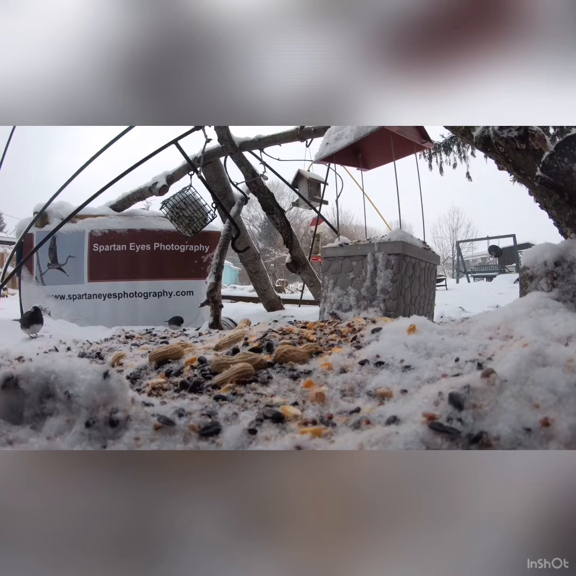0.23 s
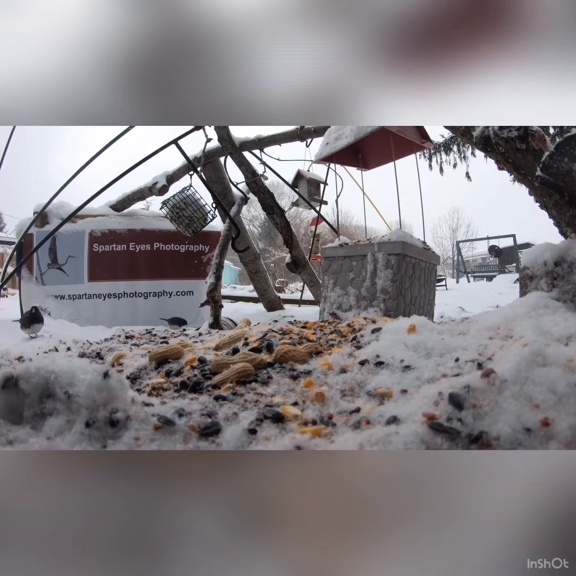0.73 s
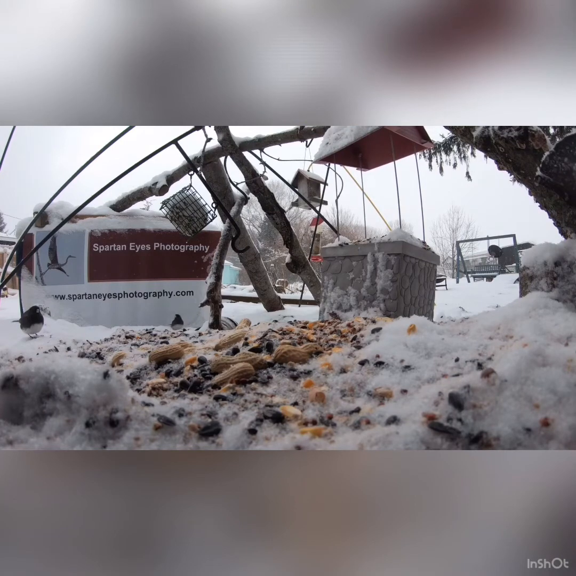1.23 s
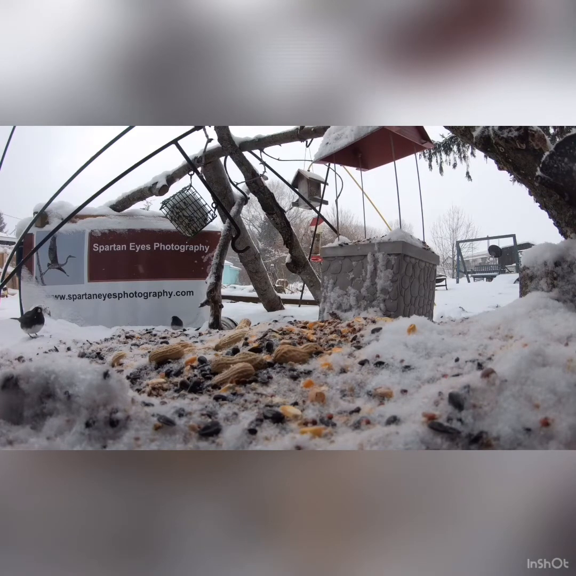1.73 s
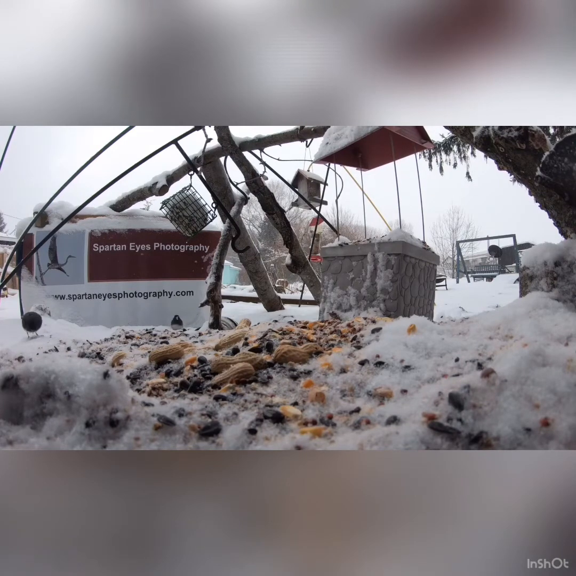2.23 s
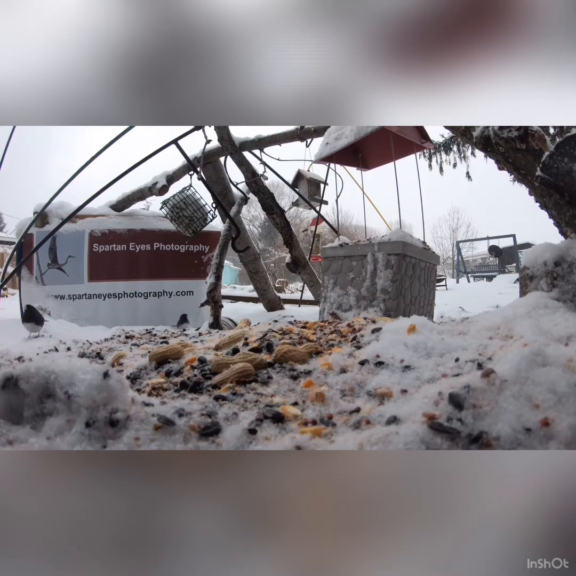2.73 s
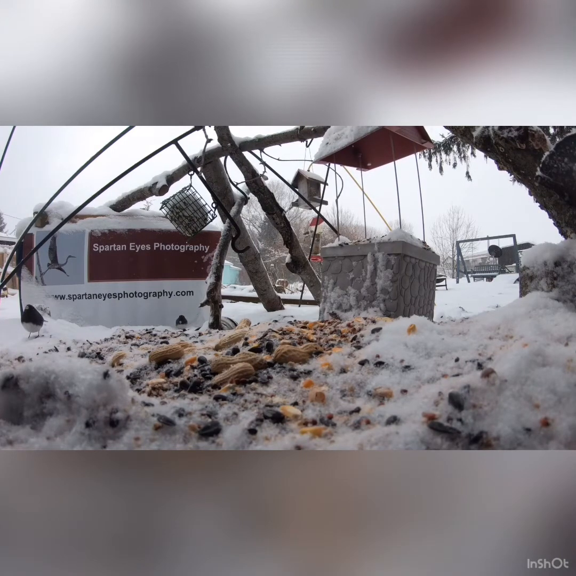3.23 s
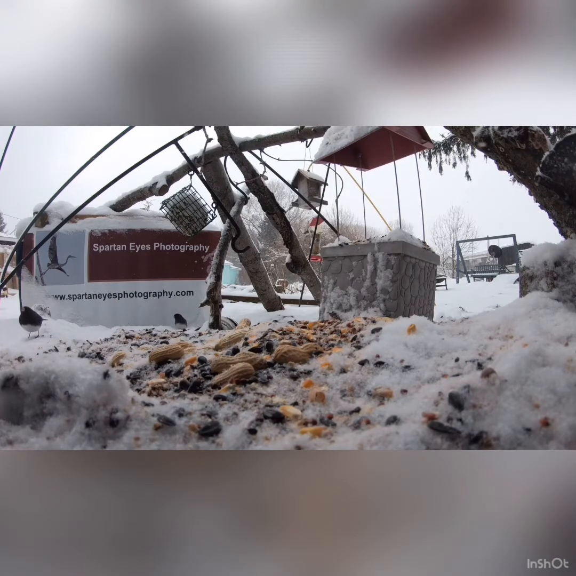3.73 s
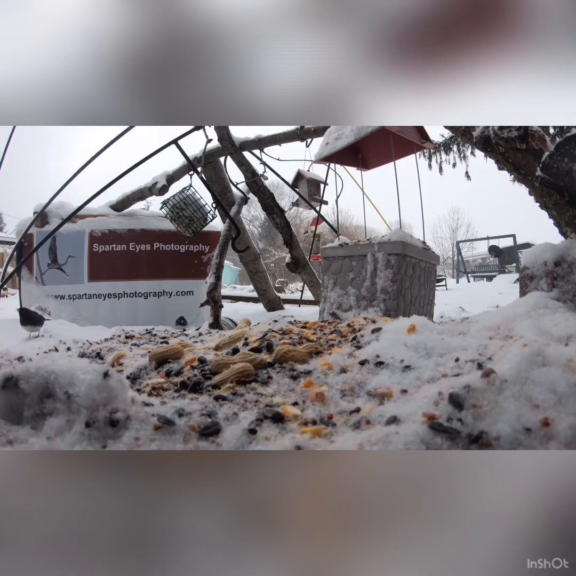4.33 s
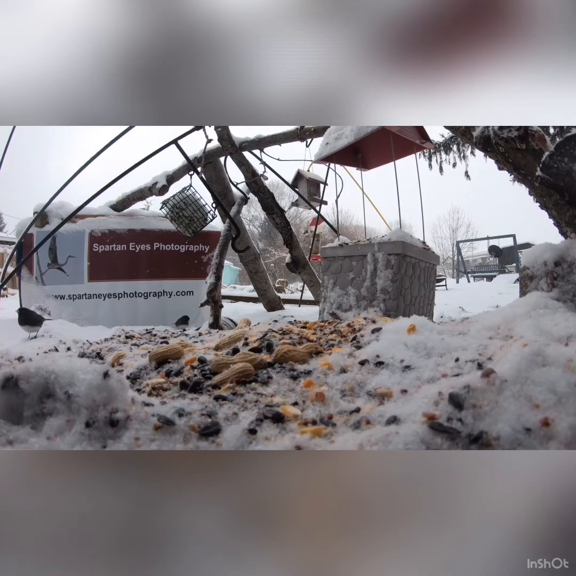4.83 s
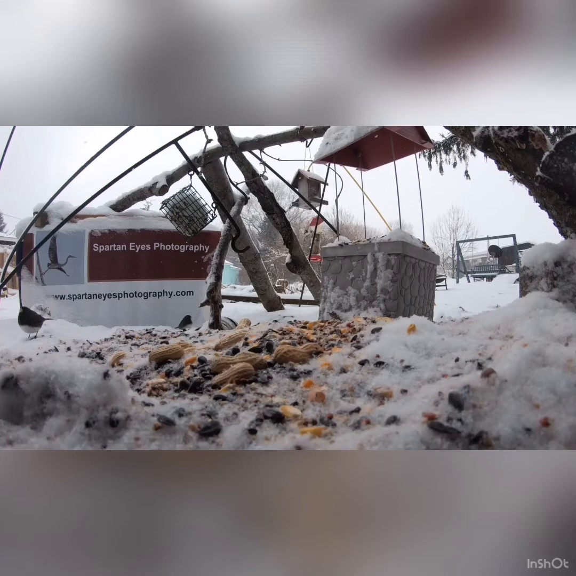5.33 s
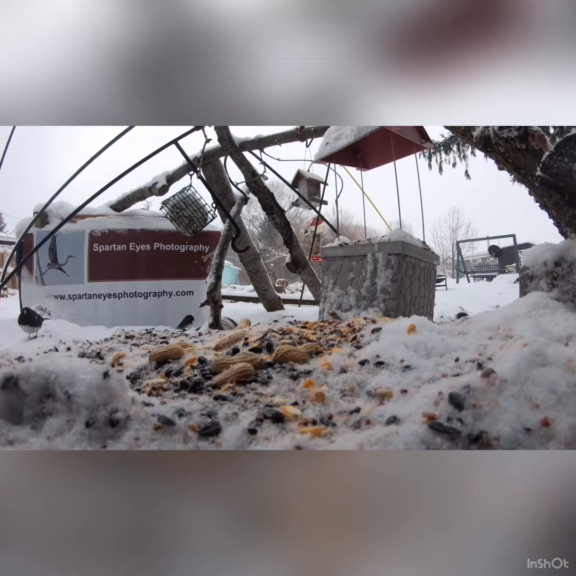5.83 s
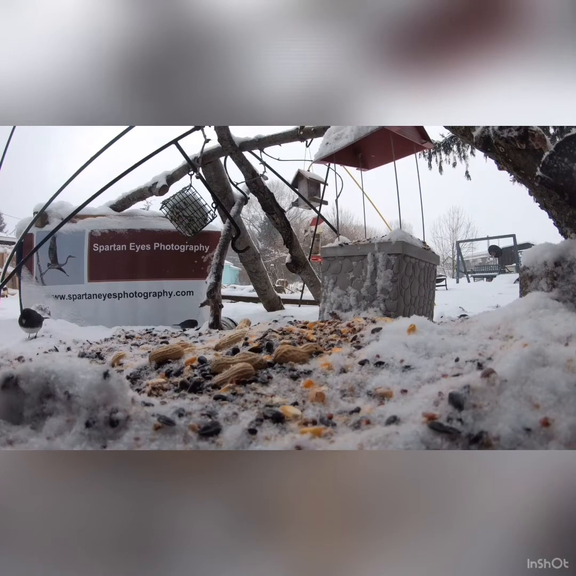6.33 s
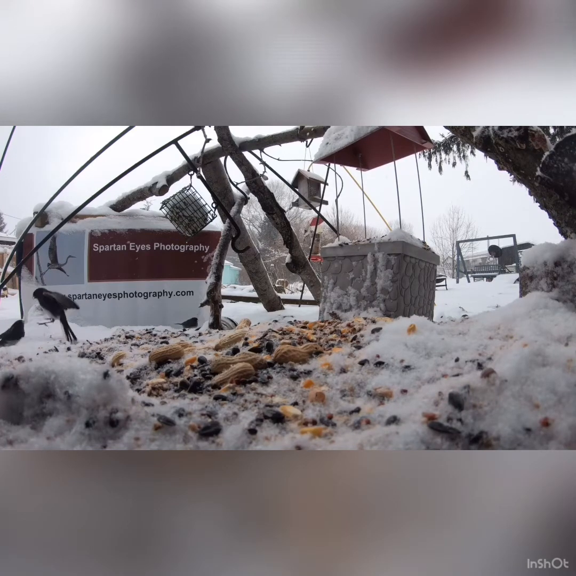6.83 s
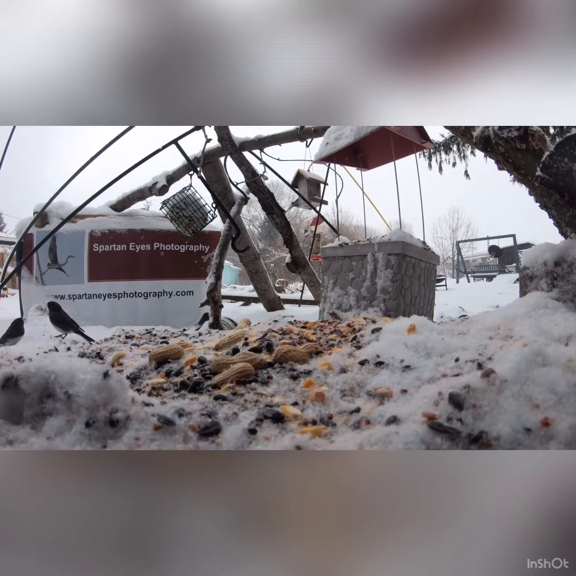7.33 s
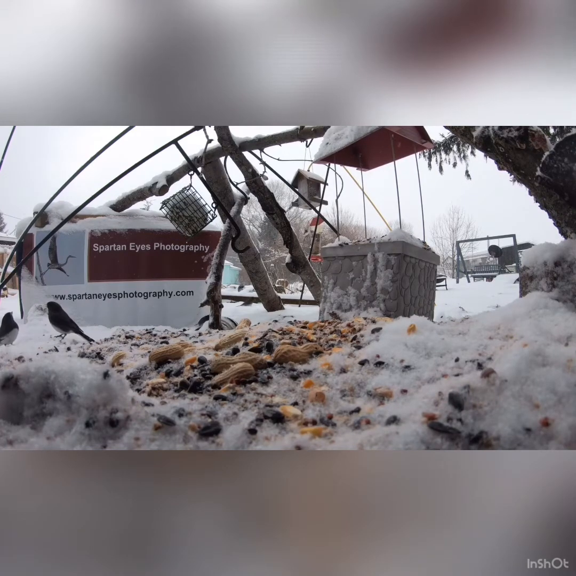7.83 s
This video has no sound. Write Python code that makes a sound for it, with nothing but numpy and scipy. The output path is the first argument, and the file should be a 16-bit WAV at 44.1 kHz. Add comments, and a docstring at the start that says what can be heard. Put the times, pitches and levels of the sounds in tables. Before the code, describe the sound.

Small birds scold with ticks and falling nasal notes, then fast high trills ring out over a low lumpy outdoor rumble and faint hiss.

```python
"""On snowy ground, juncos squabble over seed near two microphone ports, above a low rumble and a faint hiss.
They scold with falling 'tew' notes, ticks and one buzz; two singers run through four trilled figures.
Each bird note is a gliding tone with overtones; short bursts of noise make seed crunches and wing flutters.
Delayed copies and fading noise tails give the birds echoes from nearby boxes, trunks and branches.
The rumble is low noise, almost the same in both ears, that swells in lumps."""
import sys
import numpy as np
from scipy import signal
from scipy.fft import rfft, irfft, next_fast_len
from scipy.io import wavfile
from scipy.ndimage import uniform_filter1d

SR = 44100
rng = np.random.default_rng(int(sys.argv[2]) if len(sys.argv) > 2 else 0)


def store_pcm(level_fs):
    """Save levels as 16-bit WAV."""
    pcm = np.round(np.clip(level_fs, -1, 1) * 32767).astype(np.int16)
    wavfile.write(sys.argv[1], SR, np.atleast_2d(pcm).T)


N = 357210  # length in samples

# All note levels are before the throat, echo and microphone filters.
# Noise colour of the rumble and hiss. Each row: frequency in Hz, relative level in dB per Hz.
RUMBLE_SPECTRUM = [(12, -62.5), (20, -39.5), (49, 3.5), (85, -3.5), (129, -2), (196, -7), (298, -21.5),
                   (534, -43), (857, -34.5), (1410, -49.5), (3260, -58.5), (5230, -57.5), (6360, -59),
                   (8170, -51), (15500, -87)]
# Level of the deep rumble over time. Each row: time in seconds, level in dB.
DEEP_SWELL = [(0.0, -59.5), (1.08, -46.5), (2.59, -57), (2.8, -47), (3.07, -60.5), (4.56, -56), (4.65, -43),
              (5.07, -67), (6.75, -45.5), (8.1, -65.5)]
# Level of the upper rumble over time. Each row: time in seconds, level in dB.
UPPER_SWELL = [(0.0, -49.5), (3.92, -54), (6.72, -51), (8.1, -58.5)]
# How alike left and right are. Each row: frequency in Hz, likeness (1 same, 0 unrelated, -1 opposite).
LIKENESS = [(30, 0.9435), (150, 1), (300, 0.804), (550, 0.25), (800, -0.422), (1500, -0.34), (8000, 0.34)]
# Pecks and hops among the seed. Each row: start in seconds, level in dB before colouring.
PECKS = [(0.278, -55.5), (1.646, -61), (3.472, -56.5), (3.876, -57), (5.563, -62.5), (6.609, -54)]
# Wing flutters. Each row: start in seconds, length in seconds, level in dB before colouring.
FLUTTERS = [(1.452, 0.238, -78.5), (2.781, 0.0588, -55), (2.825, 0.052, -52), (6.665, 0.33, -62)]
# Ticks. Each row: start in seconds, level in dB, length in ms.
TICKS = [(1.778, -33, 16.6), (2.056, -32.5, 11.67), (2.66, -37.5, 10.3), (2.836, -39, 16.6),
         (3.637, -31, 19.83), (3.739, -38.5, 10.8), (4.019, -38, 9.73), (4.352, -29, 15.86),
         (6.406, -36.5, 9.23), (6.457, -32, 18.3), (7.459, -32, 10), (7.512, -28, 11.1)]
# Tew notes. Each row: start in seconds, level in dB, length in ms, pitch after the dive in Hz,
# sag along the shelf as a share of that pitch.
TEWS = [(1.837, -38.5, 73.7, 1883, 0.183), (1.969, -38.5, 84.1, 1980, 0.19),
        (2.112, -41.5, 77.6, 1810, 0.0857), (2.261, -41, 87, 2250, 0.323), (2.405, -38, 88.4, 1975, .21),
        (2.548, -38, 92.9, 1916, .19), (2.697, -36.5, 89.5, 1960, 0.212), (2.847, -35.5, 90.96, 1925, .19),
        (2.995, -38.5, 95.1, 1960, 0.214), (3.161, -38.5, 94.5, 1982, 0.235),
        (3.339, -39, 92.7, 1930, 0.216), (4.094, -43.5, 88.6, 1740, 0.1744),
        (4.257, -42.5, 86.2, 1745, 0.1195), (4.402, -41, 89, 1847, 0.1418), (6.505, -36.5, 96, 1887, 0.119),
        (6.523, -39.5, 72, 1854, .18), (6.658, -36, 72.7, 1890, 0.125), (6.81, -35, 55.2, 1863, 0.0472),
        (6.936, -35.5, 74.9, 1802, 0.0292), (7.577, -40, 76, 1790, 0.0746),
        (7.733, -40, 84.4, 1770, 0.1087), (7.885, -39, 88.2, 1880, 0.1306),
        (8.025, -38, 85.3, 1850, 0.0786)]
# Basic strength of the tew's harmonics from 2 up. One column: level in dB, before each note's own changes.
TEW_OVERTONES = [-4.5, -9.5, -13, -10.5, -18, -16.5, -16.5]
# Bouts of scolding. Each row: first second, time scale of the dive in ms, last pitch in Hz,
# overtone boost in dB, growth of that boost in dB per second.
BOUTS = [(1.75, 8.3, 983.7, -7.5, 4), (4.0, 10.25, 1220, -6, 4.5), (6.4, 11, 1256, -4.5, 4)]
# Throat of the scolding birds. Each row: frequency in Hz, gain in dB.
SCOLD_THROAT = [(3500, 0), (5300, -1.5), (8500, 5), (9600, 2), (11000, -10.5)]

# Song figures hold strokes, each one straight glide. Each row, in every figure below: start in ms,
# length in ms, from Hz, to Hz, relative level in dB, loudest at this share of the length,
# hoarseness as a share of the pitch.
# Opening flick, up then down (start, length in ms; from, to in Hz; dB; peak share; hoarse share).
LEAD_IN = [(0, 9.7, 3510, 5145, -31.5, 0.55, .04), (8, 11, 5230, 3608, -35, 0.39, .04)]
# Flick up, flick down, thin whistle, falling whistle (columns as above: ms, ms, Hz, Hz, dB, share, share).
TWITTER = [(1.0095, 10, 3500, 5200, 4, .6, 0.033), (8, 11, 5200, 3500, -1.5, .35, .045),
           (15, 32, 4650, 5400, -7.5, 0.585, .02), (36.56, 28.15, 4350, 3400, -3, 0.43, .022)]
# Slowly rising whistle, high crest, plunge, run-out (columns as above: ms, ms, Hz, Hz, dB, share, share).
SLUR = [(0, 41, 3800, 4500, -0.5, 0.538, .008), (29, 36, 5950, 5800, -6.5, 0.57, 0.023),
        (54, 25, 5900, 3750, -1.5, 0.784, 0.04), (72.15, 22, 4000, 3200, -1.5, 0.2, .018)]
# Slide down, rising whistle, flick up, afternote (columns as above: ms, ms, Hz, Hz, dB, share, share).
WARBLE = [(-4, 49, 6000, 5120, 0, 0.373, 0.0262), (53.5, 72, 4300, 4700, 0.5, .42, 0.0083),
          (114.5, 21.36, 4300, 6300, 2, 0.68, 0.073), (126.5, 38.7, 4500, 4200, -7, .25, 0.011)]
# Soft dipping whistle, down then up (columns as above: ms, ms, Hz, Hz, dB, share, share).
LAST_NOTE = [(0, 40, 4100, 3450, -58, 0.76, 0.011), (24, 63.7, 3200, 3645, -58, 0.36, .012)]
# Scoop, swelling whistle, crack, rasp, low second voice, falling whistle
# (columns as above: ms, ms, Hz, Hz, dB, share, share).
WHIP = [(0, 8.88, 3700, 4900, -15.5, 0.89, .02), (3.5, 35, 4750, 5250, 2, 0.835, 0.0144),
        (32, 9, 7800, 5100, 5, 0.547, 0.0292), (34, 56, 4500, 5600, -12.5, 0.201, .36),
        (52, 23.42, 2250, 2550, -6, 0.443, 0.0498), (54, 38, 4700, 3330, 2, 0.545, 0.0122)]
# Hoarse chip, its upper voice, low murmur, loud whistle, thin whistle, crack
# (columns as above: ms, ms, Hz, Hz, dB, share, share).
CHIP_RISE = [(0.997, 20, 3150, 5200, 3, 0.381, 0.0605), (4.015, 20, 4400, 7700, -3, .38, 0.14945),
             (16, 21.5, 3200, 4100, -5, 0.5, .02), (29.03, 21.45, 3830, 4250, 6, 0.474, 0.0097),
             (50.17, 30, 4500, 5500, -3, 0.577, 0.015), (72.46, 15, 8600, 4900, 4, 0.547, .11)]
# Throat of the first singer. Each row: frequency in Hz, gain in dB.
SONG_THROAT = [(2800, -13.5), (3500, -1.5), (5400, 2.5), (6200, -19), (7300, 3)]

# Early echoes. Each row: delay to the left port in ms, delay to the right port in ms, level in dB;
# both delays are scaled a little for each bird spot.
ECHOES = [(1.35, .97, -15.5), (2.2, 1.72, -14.5), (2.9, 2.45, -7.5), (4.05, 3.65, -12), (7.4, 9.8, -28)]
# Tone of the microphone. Each row: frequency in Hz, gain in dB.
MICROPHONE = [(900, -7.5), (1700, -3.5), (4500, 0), (6000, 0), (8500, -1), (10000, -1.5), (11700, -18),
              (14500, -11), (16000, -36)]
# Extra filter on the birds at the right port. Each row: frequency in Hz, gain in dB.
RIGHT_PORT = [(900, -2.5), (1400, -8.5), (1780, -15.5), (2300, -0.5), (4000, -3), (8000, 0)]


def amp(db):
    """Turns decibels into gain."""
    return 10 ** (np.asarray(db) / 20)


def evened(x):
    """Scales a signal to an average strength (rms) of 1."""
    return x / np.sqrt(np.mean(x ** 2) + 1e-20)


def read(points, hz):
    """Reads a curve at any frequency, with straight lines on a log-frequency axis."""
    f, value = np.transpose(points)
    return np.interp(np.log(hz + 1), np.log(f + 1), value)


def add(mix, s, sound):
    """Mixes a sound in, starting at s seconds."""
    part = mix[max(round(s * SR), 0):][:len(sound)]
    part += sound[:len(part)]


def colour(x, points):
    """Filters a sound by a table of Hz and dB."""
    hz = np.fft.rfftfreq(2 * N, 1 / SR)
    return irfft(rfft(x, 2 * N) * amp(read(points, hz)))[:N]


def wander(count, hz):
    """Smooth random drift with an rms of about 1, weakening at rates near and above hz."""
    size = next_fast_len(max(count, SR // 10))
    f = np.fft.rfftfreq(size, 1 / SR)
    spectrum = rfft(rng.standard_normal(size)) / (1 + (f / hz) ** 2) ** 2
    return evened(irfft(spectrum, size))[:count]


def rumble(swing_db=3.0, total_db=-42):
    """Low noise swells in lumps, nearly alike at both ports, under a faint wide hiss."""
    hz = np.fft.rfftfreq(N, 1 / SR)
    a, b = rfft(rng.standard_normal((2, N)))
    same = np.clip(read(LIKENESS, hz), -1, 1)
    right = same * a + np.sqrt(1 - same ** 2) * b
    noise = np.array([a, right]) * amp(read(RUMBLE_SPECTRUM, hz))
    noise *= amp(total_db) / irfft(noise, N).std()  # this sets the hiss; the bands below get new levels
    deep = 1 / (1 + (hz / 110) ** 8)
    bass = 1 / (1 + (hz / 400) ** 8)
    out = irfft(noise * (1 - bass), N)  # the hiss
    t = np.arange(N) / SR
    for band, curve, lumps_db in ((deep, DEEP_SWELL, swing_db), (bass - deep, UPPER_SWELL, swing_db / 2)):
        lumpy = evened(irfft(noise * band, N) * amp(lumps_db * wander(N, 15.0)))
        out += lumpy * amp(np.interp(t, *np.transpose(curve)))
    return out


def rustles(peck_decay_s=0.00255, wing_hz=24):
    """Fast-fading noise makes seed crunches; noise with a pulsing level makes feathers beat."""
    out = np.zeros(N)
    t = np.arange(2000) / SR
    for s, db in PECKS:
        add(out, s, amp(db) * np.exp(-t / peck_decay_s) * rng.standard_normal(len(t)))
    for s, length, db in FLUTTERS:
        u = np.arange(0, length, 1 / SR)
        beat_db = 1.1 * np.sin(2 * np.pi * wing_hz * u)
        beats = amp(db + beat_db + 4.5 * wander(len(u), 250))
        add(out, s, beats * signal.windows.tukey(len(u), .5) * rng.standard_normal(len(u)))
    return colour(out, [(500, -20.5), (1500, 7.5), (4000, 5.0), (6500, 2.5), (9000, 4.0), (14000, -14)])


def tone(hz, level_db, overtones_db, jitter=0.0063, hoarse=0, shimmer_db=1.5):
    """One side of a bird's voice organ: an unsteady tone with overtones, made hoarse by fast pitch chaos."""
    count = len(hz)
    hz = hz * (1 + jitter * wander(count, 450) + hoarse * wander(count, 2603))
    phase = 2 * np.pi * np.cumsum(hz) / SR
    wave = np.sin(phase)
    for k, db in enumerate(overtones_db, 2):
        audible = k * hz < SR / 2  # skip overtones too high for the sample rate
        wave = wave + amp(db + 2 * wander(count, 27)) * np.sin(k * phase) * audible
    ends = signal.windows.tukey(count, min(90 / count, 1))  # about 1 ms of fade at each end
    return wave * ends * amp(level_db + shimmer_db * wander(count, 110))


def ticks(top_hz=14000, halving_ms=1.75, attack_ms=2.04, onset_db=-15, end_db=-15, hoarse=0.092):
    """A rough dive too fast to follow sounds like a click; its period grows, so a longer tick ends lower."""
    out = np.zeros(N)
    for s, db, length in TICKS:
        ms = np.arange(0, length, 1000 / SR)
        level = np.interp(ms, [0, attack_ms, length], [onset_db, 0, end_db])
        hz = top_hz / (1 + ms / halving_ms)
        add(out, s, tone(hz, db + level, [-6, -15], hoarse=hoarse))
    return out


def glide(rows):
    """Joins rows of ms, Hz and dB into smooth pitch and level curves."""
    ms, hz, db = np.transpose(rows)
    t = np.arange(0, max(ms[-1] - ms[0], 3), 1000 / SR) + ms[0]
    ordered_ms = np.maximum.accumulate(ms)
    return [uniform_filter1d(np.interp(t, ordered_ms, curve), size=50) for curve in (hz, db)]


def tews(top_hz=7500, knee=0.69, dive_db=2, body_db=-2, knee_db=-1, end_db=-17, pure_db=-9, spread_db=2.5):
    """The pitch dives from high up, sags along a shelf rich in overtones, then drops away."""
    out = np.zeros(N)
    for s, db, length, shelf_hz, sag in TEWS:
        since, dive, end_hz, first_db, growth = [bout for bout in BOUTS if bout[0] <= s][-1]
        knee_hz = shelf_hz * (1 - sag)
        rich_db = first_db + growth * (s - since)  # the voice grows harsher through a bout
        hz, level = glide([
            (0, top_hz, -16),
            (.2 * dive, 0.79 * top_hz, -5),
            (0.52 * dive, 4200, dive_db),
            (0.87 * dive, 2450, dive_db),
            (1.25 * dive, shelf_hz, body_db),
            (.33 * length, .6 * knee_hz + .4 * shelf_hz + 45, body_db),
            (knee * length, knee_hz, knee_db),
            (.88 * length, 1.08 * end_hz, -4.5),
            (length, end_hz, end_db)])
        purity = pure_db * np.clip(np.log2(hz / shelf_hz), 0, 2)  # weaker overtones high in the dive
        overtones = [h + rich_db + spread_db * (rng.standard_normal() - 1) + purity
                     for h in TEW_OVERTONES]
        strain = np.clip(hz / shelf_hz - 1, 0, 1)  # the dive is hoarser than the shelf
        add(out, s, tone(hz, db + level, overtones, hoarse=0.0136 + 0.0545 * strain))
    return out


def buzz(s=4.103, length_s=0.1034, centre_hz=8300, swing_hz=470, beat_hz=79, flutter_hz=640,
         depth_hz=380, db=-37.5):
    """A slow and a fast vibrato swing one high note at once."""
    t = np.arange(0, length_s, 1 / SR)
    slow = np.cos(2 * np.pi * beat_hz * t)
    fast_rate = flutter_hz * (1 + 0.2 * wander(len(t), 200))
    fast = np.sin(2 * np.pi * np.cumsum(fast_rate) / SR)
    note = tone(centre_hz - swing_hz * slow + depth_hz * fast, db, [-24], jitter=0.019)
    out = np.zeros(N)
    add(out, s, note * signal.windows.tukey(len(t), .2))
    return out


def syllable(figure, s, db, overtones_db, onset_db=-15.5, end_db=-14.5, hiss_db=-22):
    """Sings a figure once: gliding strokes swell and fade over a faint bright hiss, a bit different each time."""
    out = np.zeros(N)
    for start_ms, length_ms, from_hz, to_hz, peak_db, peak_at, hoarse in figure:
        u = np.linspace(0, 1, round(max(length_ms, 3) * SR / 1000))
        swell = np.interp(u, [0, np.clip(peak_at, .05, .95), 1], [onset_db, 0, end_db])
        level = db + peak_db + swell
        hz = from_hz * (to_hz / from_hz) ** u
        stroke = tone(hz, level, overtones_db, jitter=0.009, hoarse=hoarse)
        hiss = amp(level + hiss_db) * np.gradient(rng.standard_normal(len(u)))
        add(out, s + start_ms / 1000, stroke + hiss)
    return out


def trill(figure, start_s, count, period_ms, slowing_ms, first_db, full_db, last_db, overtones_db, rise=1):
    """Repeats a figure, each gap slowing_ms longer than the last; full level comes after `rise` repeats."""
    k = np.arange(count)
    times = start_s + (period_ms * k + slowing_ms * k * (k - 1) / 2) / 1000
    levels = np.interp(k, [0, rise, count - 1], [first_db, full_db, last_db])
    return sum(syllable(figure, s, db, overtones_db) for s, db in zip(times, levels))


def first_song():
    """Gliding tones form a flick, a fast twitter and three slurs, then two soft warbles and a low whistle."""
    return (syllable(LEAD_IN, s=4.414, db=0.5, overtones_db=[-15.5, -23])
            + trill(TWITTER, start_s=4.4424, count=8, period_ms=71.8, slowing_ms=1.2,
                    first_db=-33.5, full_db=-32.0, last_db=-30.5, overtones_db=[-18, -26])
            + trill(SLUR, start_s=5.052, count=3, period_ms=114.77, slowing_ms=0,
                    first_db=-35, full_db=-32.0, last_db=-35.0, overtones_db=[-15, -23.5])
            + syllable(WARBLE, s=5.735, db=-56.5, overtones_db=[-26])
            + syllable(WARBLE, s=6.028, db=-56.5, overtones_db=[-15])
            + syllable(LAST_NOTE, s=6.17, db=-1, overtones_db=[-13.5]))


def second_song():
    """Gliding tones form a swelling trill of whips that runs straight into a trill of rising chips."""
    return (trill(WHIP, start_s=6.6452, count=8, period_ms=103, slowing_ms=1.3,
                  first_db=-34.5, full_db=-27.5, last_db=-29.0, rise=3.17, overtones_db=[-18, -30])
            + trill(CHIP_RISE, start_s=7.449, count=7, period_ms=104.5, slowing_ms=.9,
                    first_db=-37.0, full_db=-30.5, last_db=-32.0, overtones_db=[-18.5, -23]))


def yard(x, lag_ms, spread, scatter_db, far_db, scatter_t60=0.0284, far_t60=0.241):
    """Direct sound, echoes off close objects, quick scatter from branches and a faint tail over snow."""
    size = next_fast_len(N + SR, real=True) // 2 * 2
    hz = np.fft.rfftfreq(size, 1 / SR)
    t = np.arange(SR // 2) / SR

    def delay(ms):
        """A delay turns the phase of each frequency."""
        return np.exp(-2j * np.pi * hz * ms / 1000)

    paths = np.array([1 + sum(amp(row[2]) * delay(row[side] * spread) for row in ECHOES)
                      for side in (0, 1)])
    paths[1] *= delay(lag_ms)  # the right port hears the direct sound and these echoes later
    for db, t60 in ((scatter_db, scatter_t60), (far_db, far_t60)):
        fade = np.exp(-np.log(1000) * t / t60)  # falls by 60 dB in t60 seconds
        tail = rng.standard_normal((2, len(t))) * fade * (t > .002)
        paths += amp(db) * rfft(tail / np.linalg.norm(tail[0]), size)
    paths[1] *= amp(read(RIGHT_PORT, hz))
    return irfft(rfft(x, size) * paths * amp(read(MICROPHONE, hz)))[:, :N]


def scene():
    """Puts the scolding birds and the two singers at different spots, over the rumble."""
    scolds = colour(tews() + ticks() + buzz(), SCOLD_THROAT) + rustles()
    first = colour(first_song(), SONG_THROAT)
    return (yard(scolds, lag_ms=0.26985, spread=0.9472, scatter_db=0, far_db=-15.5)
            + yard(first, lag_ms=0.036, spread=1.0, scatter_db=-1.5, far_db=-21.5)
            + yard(second_song(), lag_ms=0.03414, spread=1.08, scatter_db=-4.5, far_db=-14)
            + rumble())


def record(dry, edge_hz=15700):
    """A steep low-pass filter removes the sound above edge_hz."""
    low_pass = signal.firwin(511, edge_hz, window=("kaiser", 9), fs=SR)
    return signal.oaconvolve(dry, low_pass[None], "same")


dry = scene()
out = record(dry)
store_pcm(out)
```